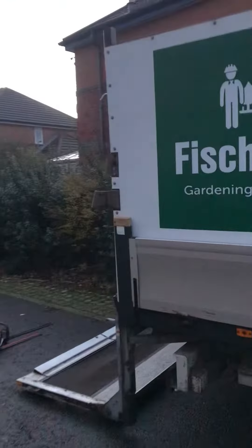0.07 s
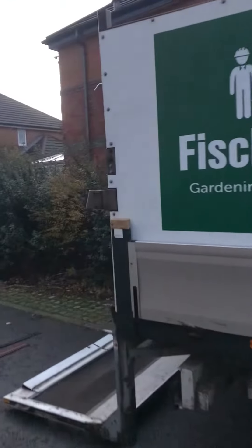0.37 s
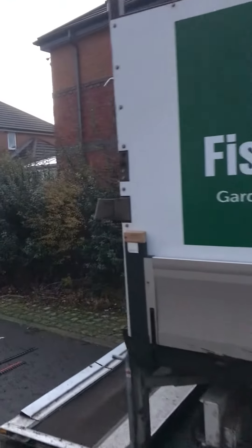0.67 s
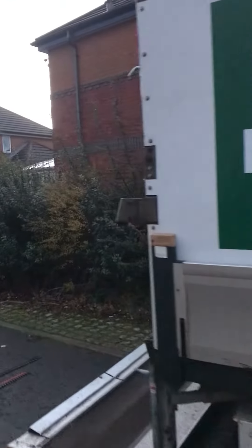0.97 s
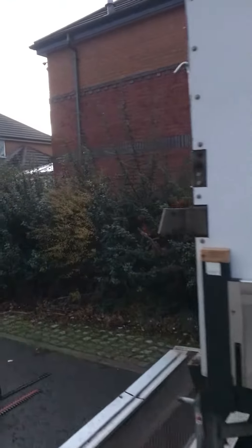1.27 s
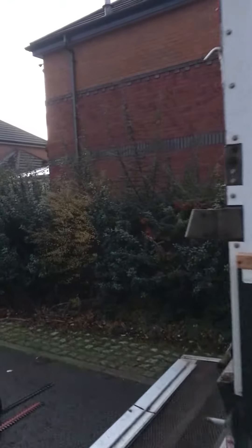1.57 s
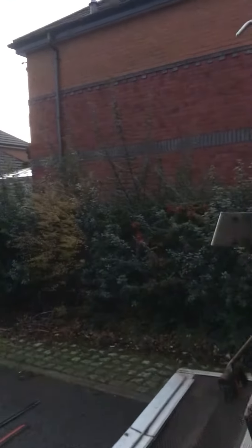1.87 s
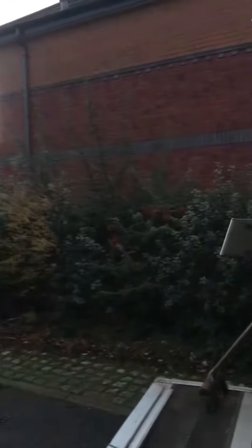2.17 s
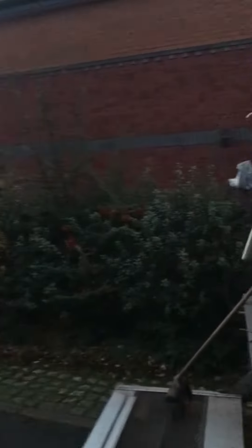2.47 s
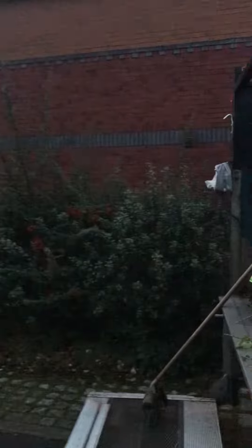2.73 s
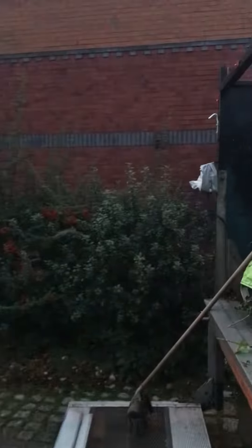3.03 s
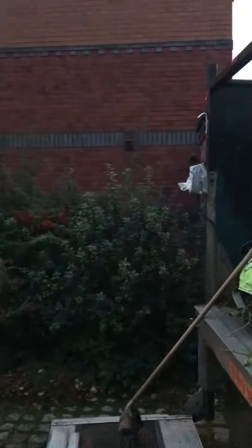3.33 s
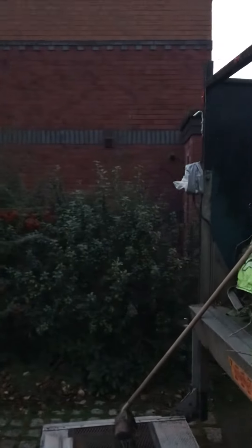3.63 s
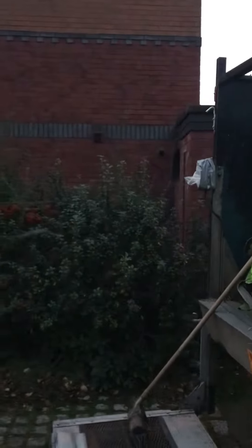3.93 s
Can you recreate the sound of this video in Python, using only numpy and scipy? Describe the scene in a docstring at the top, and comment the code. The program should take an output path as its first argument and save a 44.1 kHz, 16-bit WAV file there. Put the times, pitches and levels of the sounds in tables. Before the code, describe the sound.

A steady, low wash of far-off tyres and engines fills a quiet street. Soft wind bumps the microphone at first, a small cluster of gritty ticks follows, then the wind returns with stronger thumps over faint rustling.

```python
"""A quiet residential street: distant tyres roar and whine over engine rumble and faint microphone hiss.
It opens with light wind fluttering and thumping on a hand-held camera's microphone, while soft rustles,
one thin rising squeak and two ticks sound close by. A cluster of gritty ticks comes near 1.7 s, then
three far cars swell out of the roar. The wind gets busier from 2.3 s and thumps hardest near 3.5 s."""
import sys
import numpy as np
from scipy.fft import rfft, irfft, next_fast_len
from scipy.io import wavfile
from scipy.ndimage import uniform_filter1d, map_coordinates

SR = 44100
rng = np.random.default_rng(int(sys.argv[2]) if len(sys.argv) > 2 else 0)


def unload_wav(signal):
    """Save mono or channel-first audio to the path in sys.argv[1] as 16-bit WAV at rate SR, clipped to [-1, 1]."""
    wavfile.write(
        sys.argv[1],
        SR,
        np.round(np.clip(np.atleast_2d(signal).T, -1, 1) * 32767).astype(np.int16),
    )


N = 176400


def amp(db):
    """Decibels to gain."""
    return 10 ** (np.asarray(db) / 20)


def unit(x):
    """Scale to rms 1."""
    return x / np.sqrt(np.mean(x ** 2) + 1e-20)


def clock():
    """The time of each sample in seconds."""
    return np.arange(N) / SR


def swell(time, half_length):
    """A bell-shaped fade in and out, peaking at the given time."""
    return np.exp(-((clock() - time) / half_length) ** 2)


def wobble(rate):
    """A smooth random modulator through `rate` points a second."""
    points = rng.standard_normal(int(N * rate / SR) + 4)
    return map_coordinates(points, [clock() * rate])


def filtered(x, response):
    """Filter x by a complex response, given as a function of frequency."""
    size = next_fast_len(N + SR // 2)
    hz = np.fft.rfftfreq(size, 1 / SR)
    return irfft(rfft(x, size) * response(hz), size)[:N]


def shaped(x, eq):
    """Run x through an EQ curve of (frequency [Hz], gain [dB]) points and bring it to rms 1."""
    points_hz, db = np.transpose(eq)
    return unit(filtered(x, lambda hz: amp(np.interp(np.log(hz + 1), np.log(points_hz), db))))


def noise(eq):
    """Noise of rms 1, coloured by an EQ curve."""
    return shaped(rng.standard_normal(N), eq)


def band(centre_hz, octaves, shelf=0):
    """A bell-shaped band of noise at rms 1, with an optional shelf above its centre."""
    def response(hz):
        bell = np.exp(-.5 * (np.log2((hz + 1) / centre_hz) / octaves) ** 2)
        return bell + shelf * (hz > centre_hz)
    return unit(filtered(rng.standard_normal(N), response))


# Fader ride on the tyre roar: (time [s], level [dB])
TYRE_RIDE = [(0, -50.5), (.85, -50), (1.4, -50.5), (2, -50.5), (2.9, -50.9), (3.5, -52), (4, -51.5)]
# Midrange wash of tyres on the road: (frequency [Hz], gain [dB])
TYRE_EQ = [(100, -42), (250, -11.5), (400, -6), (500, -6), (620, -3), (790, -3.5), (940, -1), (1200, -4.5),
           (1500, -8.5), (2000, -16), (2500, -21.5), (3200, -28), (4300, -33), (5000, -37), (12000, -65)]
# Low end of the engines: (frequency [Hz], gain [dB])
ENGINE_EQ = [(12, -62), (22, -26), (36, -9), (50, -1), (64, 4), (88, -4.5), (110, -6.5), (160, -10.5),
             (200, -11), (270, -14.5), (350, -19), (500, -26), (1000, -56.5)]
# Single far cars: (time [s], half length [s], level [dB], centre [Hz], width [octaves])
CAR_SWELLS = [(1.92, 0.31, -59.5, 1300, 0.24), (2.203, 0.27, -57.5, 249, 0.26),
              (2.854, 0.21, -57.5, 930, 0.22)]
def traffic(engine_db=-46.5):
    """The bed: tyre roar and engine rumble from far roads, with single cars swelling out of it."""
    tyre_db = np.interp(clock(), *np.transpose(TYRE_RIDE))
    tyres = amp(tyre_db + 0.28 * wobble(rate=10.17)) * noise(TYRE_EQ)
    engines = amp(engine_db + 0.27 * wobble(rate=4.64)) * noise(ENGINE_EQ)
    cars = sum(amp(db) * swell(time, half_length) * band(hz, octaves)
               for time, half_length, db, hz, octaves in CAR_SWELLS)
    return tyres + engines + cars


# Pitched bands inside the tyre roar: (centre [Hz], level [dB])
TREAD_BANDS = [(860, -66.5), (935, -64.5), (1030, -64)]
def tread_whine(octaves=0.047, waver_db=2.5):
    """Tyre tread sings in narrow bands of noise, each wavering in level on its own."""
    return sum(amp(db) * unit(amp(waver_db * wobble(rate=6))) * band(hz, octaves)
               for hz, db in TREAD_BANDS)


# Bright, rippled colour of the hiss: (frequency [Hz], gain [dB])
HISS_EQ = [(1000, -10.5), (4500, 2.5), (6700, 7), (7600, 0), (9000, 3.5), (9800, 5.5), (10500, -6),
           (11300, 1.5), (12200, 4.5), (12900, 8), (13700, 5), (14800, -6), (15700, 6.5)]
def microphone_hiss(level_db=-76):
    """The microphone's own steady noise floor."""
    return amp(level_db) * noise(HISS_EQ)


# Gusts on the microphone: (time [s], half length [s], level [dB])
WIND_GUSTS = [(0.032, .06, -39.5), (0.224, 0.07, -39), (0.407, 0.065, -42), (0.861, 0.04, -34.5),
              (2.486, 0.094, -41), (2.671, 0.026, -36), (2.822, 0.035, -36.5), (2.977, 0.099, -37.5),
              (3.417, 0.048, -33.5), (3.483, 0.015, -29), (3.575, 0.018, -39)]
# Bass-heavy colour of the churning air: (frequency [Hz], gain [dB])
CHURN_EQ = [(12, -57), (25, -27), (45, 1), (65, 2), (90, -3.5), (130, -12), (200, -20), (300, -30),
            (600, -49), (1500, -99)]
def wind_flutter():
    """Air churns at the microphone; the churn is levelled so it holds its strength through each gust."""
    churn = noise(CHURN_EQ)
    running_power = np.abs(uniform_filter1d(churn ** 2, size=2600))
    levelled = churn / np.sqrt(running_power + 1e-6)
    gusts = sum(amp(db) * swell(time, half_length) for time, half_length, db in WIND_GUSTS)
    return levelled * gusts


# Single eddies hitting the microphone: (time [s], peak level [dB], half length [s])
EDDY_HITS = [(0.093, -29.5, 0.0055), (0.199, -36, 0.0036), (0.259, -31, 0.0051), (0.808, -35, 0.0023),
             (0.878, -34, 0.0035), (1.199, -36, 0.0056), (1.541, -34, 0.0037), (2.328, -32, 0.002),
             (2.401, -30.5, 0.0028), (2.451, -27, 0.0011), (2.461, -26, 0.0026), (2.498, -28.5, 0.0013),
             (2.605, -25.5, 0.0023), (2.651, -32.5, 0.0027), (2.665, -28.5, 0.0015), (2.856, -33, 0.0025),
             (3.166, -33.5, 0.0048), (3.424, -27, 0.0017), (3.46, -15.5, 0.0029), (3.478, -24.5, 0.0018),
             (3.542, -26.5, 0.0033), (3.728, -32.5, 0.0035), (3.913, -31.5, 0.0042)]
def wind_thumps(rolloff_hz=59.1, q=0.68):
    """Each eddy is one push of pressure; the microphone's bass roll-off makes it swing back."""
    def bass_rolloff(hz):
        highpass = hz ** 2 / (rolloff_hz ** 2 - hz ** 2 + 1j * hz * rolloff_hz / q)
        return highpass ** 2  # two stages in series
    out = np.zeros(N)
    for time, db, half_length in EDDY_HITS:
        thump = filtered(swell(time, half_length), bass_rolloff)
        out += amp(db) * thump / (np.abs(thump).max() + 1e-12)
    return out


# Close swishes: (time [s], half length [s], level [dB], centre [Hz], width [octaves])
SWISHES = [(0.212, .08, -73.5, 6000, 0.76), (0.344, 0.1, -71, 3900, 0.73), (.88, .1, -74, 4470, .2),
           (1.08, 0.067, -78.5, 6000, .4), (1.7, 0.16, -77.5, 6000, 0.56), (1.838, 0.2, -71.5, 3130, 0.35),
           (2.065, 0.11, -70.5, 2900, 0.31), (2.413, 0.023, -71, 3630, 0.5),
           (3.166, 0.017, -69, 3500, 0.26), (3.74, 0.079, -75.5, 4600, 0.16)]
def rustles(air_db=-17, grain_db=2):
    """Soft movement close by: swishes with an airy top, made grainy by a fast flicker in level."""
    swishes = sum(amp(db) * swell(time, half_length) * band(hz, octaves, shelf=amp(air_db))
                  for time, half_length, db, hz, octaves in SWISHES)
    grain = unit(amp(grain_db * wobble(rate=350)))
    return swishes * grain


def squeak(time=.222, half_length=.027, level_db=-67.5):
    """A thin, rough friction squeak that glides up; its upper partial comes in later."""
    pitch_hz, glide_hz_per_s, jitter_hz = 7200, 42000, 260
    upper_ratio, upper_db = 1.48, -5
    hz = pitch_hz + glide_hz_per_s * (clock() - time) + jitter_hz * wobble(rate=1100)
    phase = 2 * np.pi * np.cumsum(hz) / SR
    lower = swell(time, half_length) * np.sin(phase)
    upper = swell(time + half_length, half_length) * np.sin(upper_ratio * phase)
    return amp(level_db) * (lower + amp(upper_db) * upper)


# Cracks of grit: (time [s], level [dB], centre [Hz], width [octaves])
GRIT_HITS = [(.229, -58, 6000, .7), (0.382, -60, 7500, .7), (1.616, -63, 6500, .3), (1.634, -57, 7000, .13),
             (1.714, -57, 5460, .7), (1.75, -51, 7600, .95), (1.767, -50.5, 8000, .95),
             (1.781, -57, 6500, 0.76), (2.408, -67, 3800, .6), (3.007, -61, 13000, .25),
             (3.166, -60, 3500, 0.32), (3.431, -61, 13000, .25)]
# Resonances that colour every tick: (frequency [Hz], gain [dB])
GRIT_EQ = [(2500, 14), (4200, 4), (5100, 11), (6000, 0.5), (7000, -1), (7900, -16), (8900, 5), (10500, -3),
           (13500, 3), (15500, -12)]
def grit_ticks(attack_s=0.00065, t60_s=0.012):
    """Tiny dry cracks, as of grit under a shoe: noise bursts with a sharp attack and a tight tail."""
    out = np.zeros(N)
    for time, db, hz, octaves in GRIT_HITS:
        age = np.maximum(clock() - time, 0)
        attack = 1 - np.exp(-age / attack_s)
        decay = amp(-60 * age / t60_s)
        out += amp(db) * attack * decay * shaped(band(hz, octaves), GRIT_EQ)
    return out


def scene():
    """The mono mix: street bed, wind on the microphone and small close sounds."""
    street = traffic() + tread_whine()
    wind = wind_flutter() + wind_thumps()
    close_sounds = rustles() + squeak() + grit_ticks()
    return (street + wind + close_sounds)[None]


def record(dry):
    """The camera adds its microphone's hiss and cuts everything above its band limit."""
    band_limit_hz = 15750
    return filtered(dry[0] + microphone_hiss(), lambda hz: hz < band_limit_hz)[None]


dry = scene()
out = record(dry)
unload_wav(out)
```